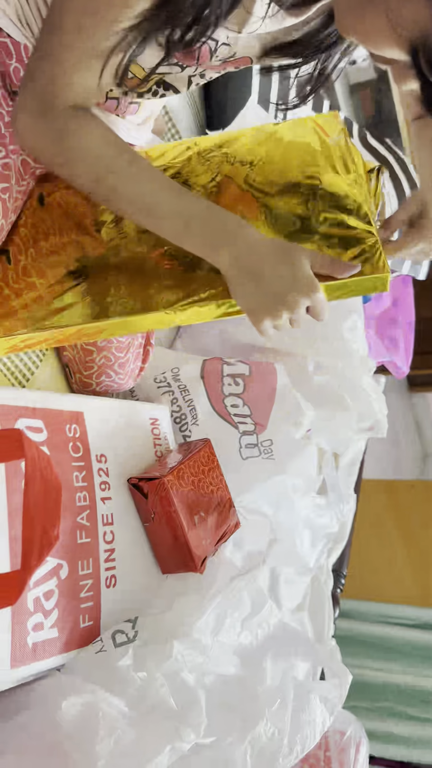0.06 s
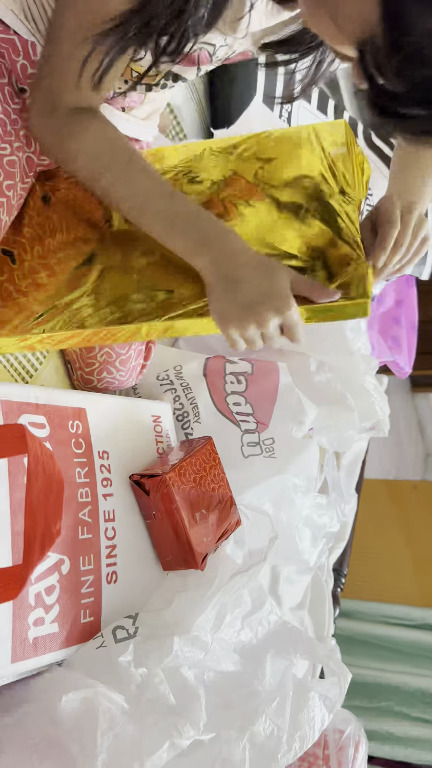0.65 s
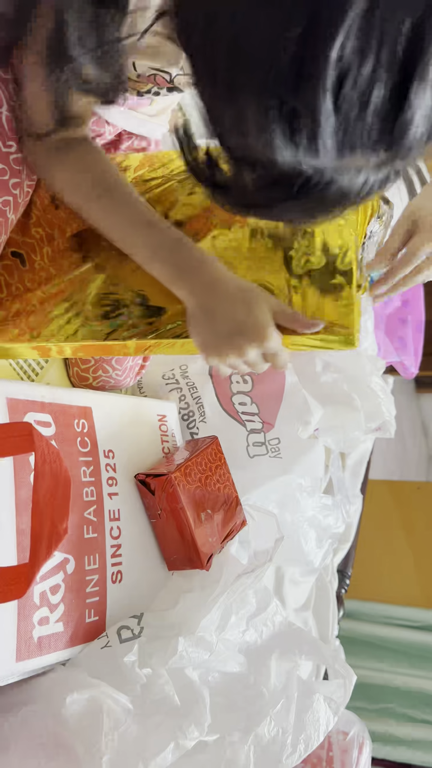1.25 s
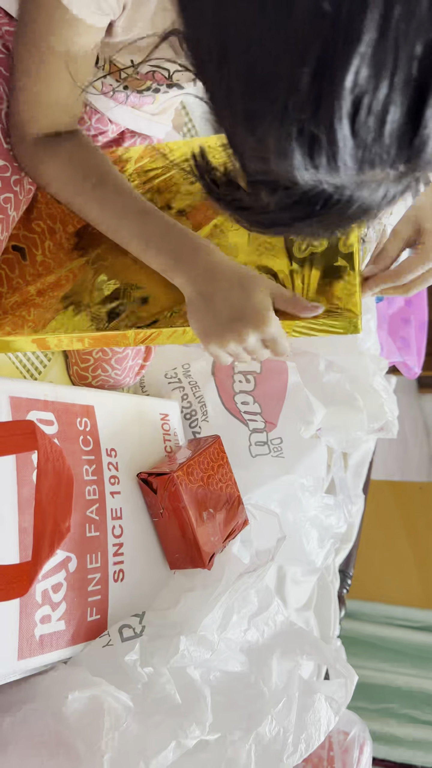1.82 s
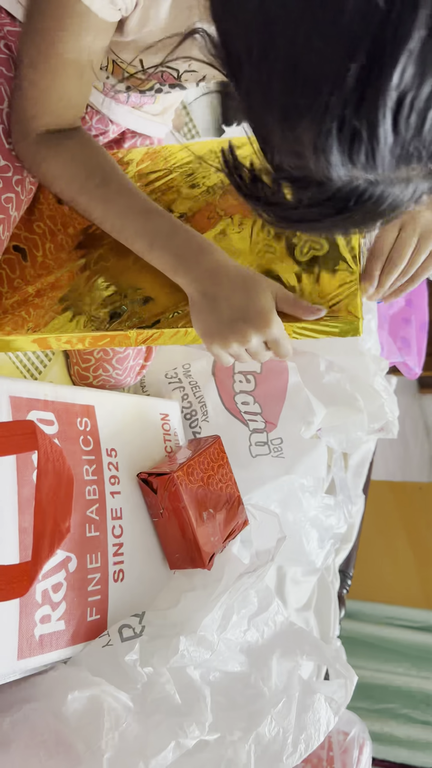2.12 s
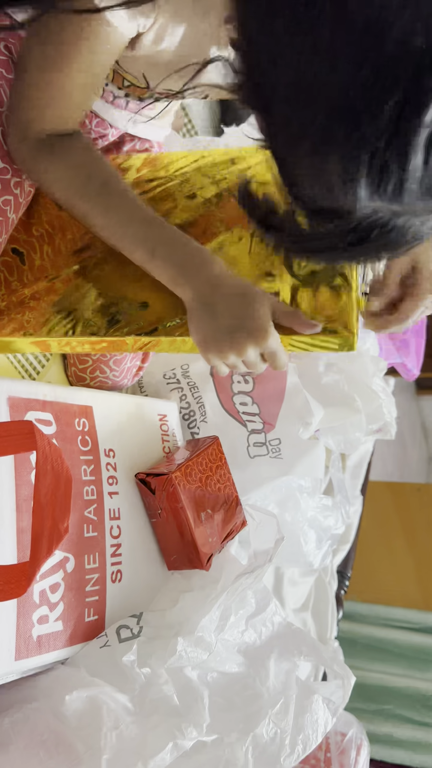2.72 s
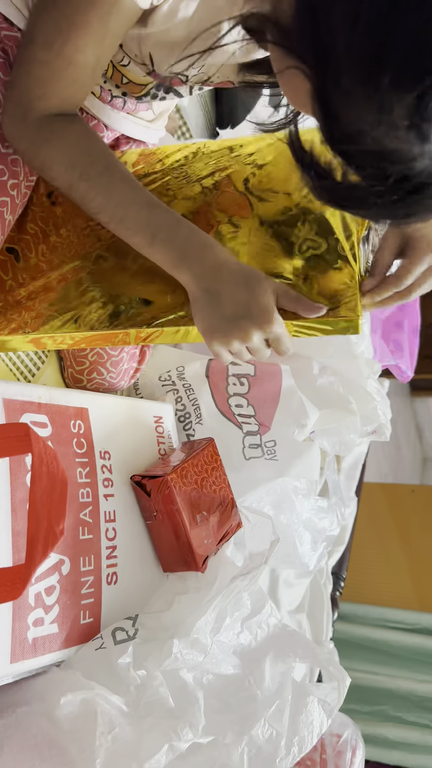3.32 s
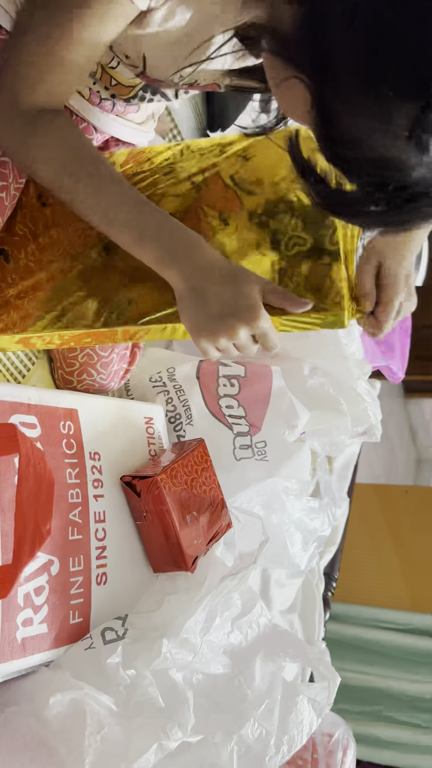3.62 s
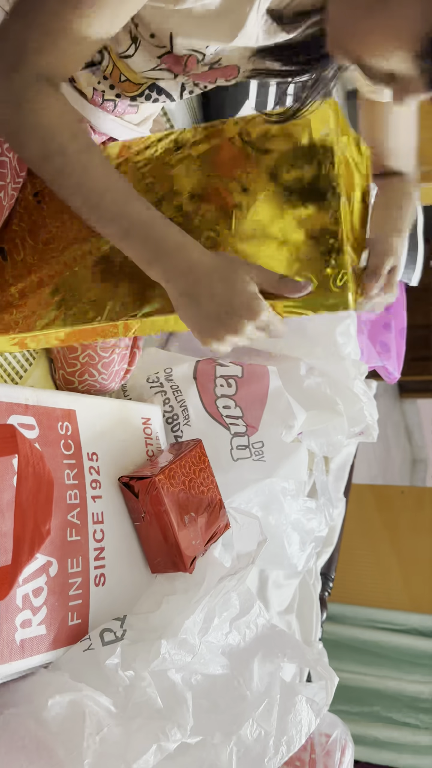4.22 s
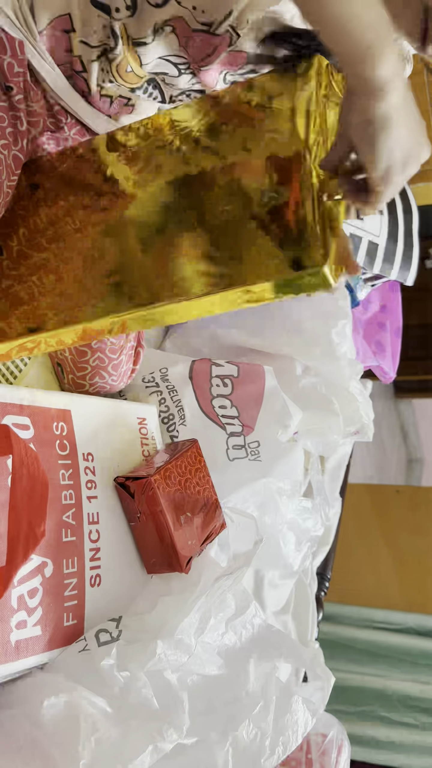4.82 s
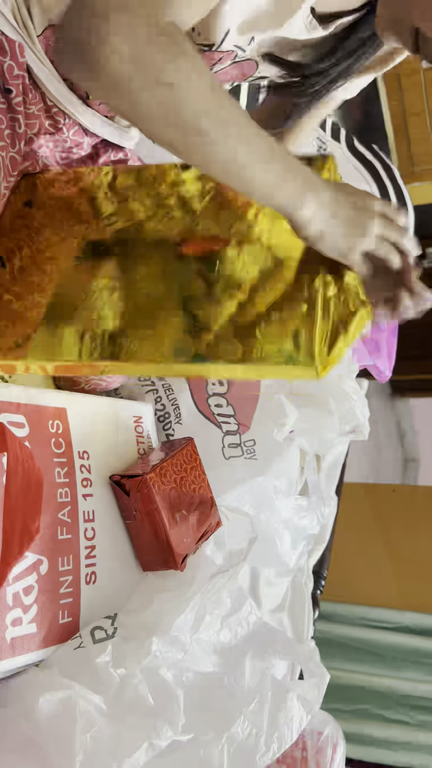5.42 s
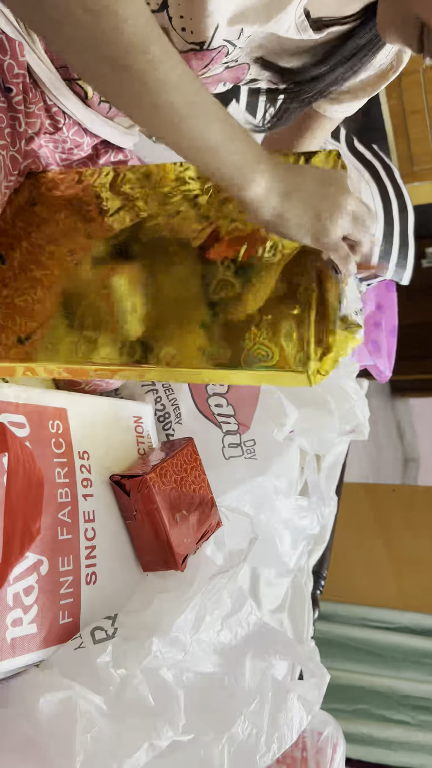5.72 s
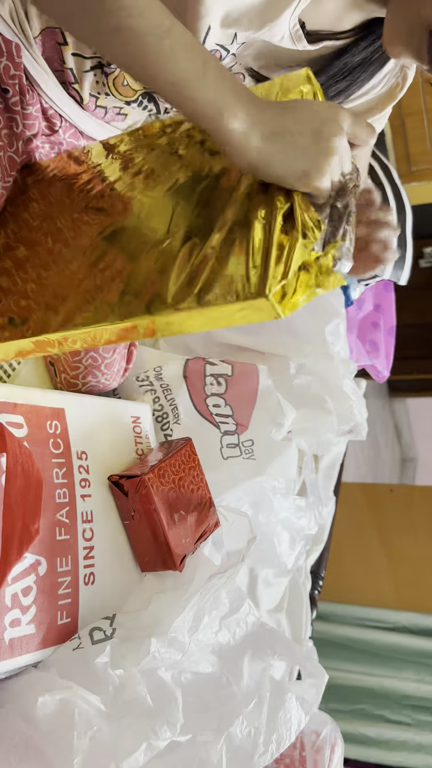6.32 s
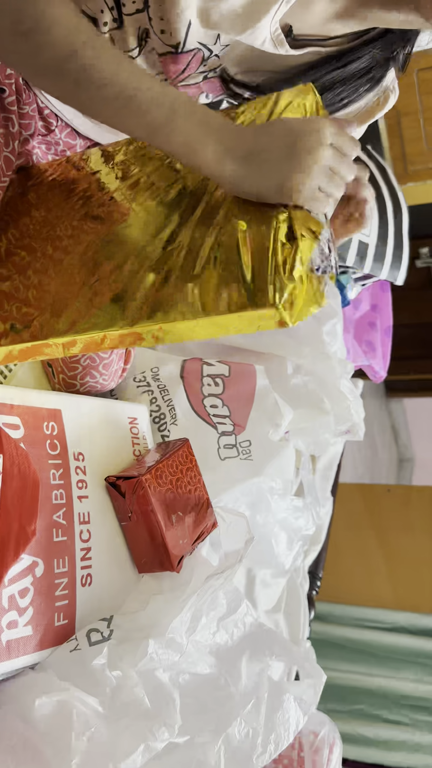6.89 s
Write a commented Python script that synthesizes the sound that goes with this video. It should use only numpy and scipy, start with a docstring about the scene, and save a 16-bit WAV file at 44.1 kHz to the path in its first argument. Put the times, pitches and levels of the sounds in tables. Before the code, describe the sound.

Hands pick at the taped end of a foil-wrapped cardboard box in a small, quiet room. The foil crinkles in light, irregular bursts with tiny snaps while fingers scuff and tap the cardboard. Halfway through, a sharp crack starts a busier stretch of tugging, with louder rustling, a few very short rips, hollow knocks and soft low bumps. The sound is close and slightly to the left.

```python
"""A small room: hands pick at the taped end of a cardboard box in metallic gift foil, then tug it open.
The foil crinkles in countless tiny buckles and cracks sharply when tape or a fold lets go.
The box scuffs by stick-slip, rings when its panels are struck and bumps on its support.
Tape and foil rip in short chains of slips. The walls answer over a faint steady background."""
import sys
import numpy as np
from scipy import signal
from scipy.fft import rfft, irfft, next_fast_len
from scipy.io import wavfile
from scipy.ndimage import uniform_filter1d, map_coordinates

SR = 44100
rng = np.random.default_rng(int(sys.argv[2]) if len(sys.argv) > 2 else 0)


def materialize(psi):
    """Save the field psi as 16-bit PCM at rate SR to the path in sys.argv[1].

    A 1-D psi becomes a single channel; in a 2-D psi each row is a channel.
    """
    bounded = np.clip(np.atleast_2d(psi).T, -1, 1)
    quanta = np.round(bounded * 32767).astype(np.int16)
    wavfile.write(sys.argv[1], SR, quanta)


N = 315315
TIME = np.arange(N) / SR


def amp(db):
    """Decibels to gain."""
    return 10 ** (np.asarray(db) / 20)


def unit(x):
    """Scale to rms 1."""
    return x / np.sqrt(np.mean(x ** 2) + 1e-20)


def along(points, hz):
    """Interpolate (freq_hz, value) points on a log axis."""
    freqs_hz, values = np.transpose(points)
    return np.interp(np.log(hz + 1), np.log(freqs_hz + 1), values)


def fade(t, t60_s):
    """Decay of 60 dB in t60_s."""
    return np.exp(-np.log(1000) * t / t60_s)


def wobble(knots_per_s):
    """Smooth random curve."""
    return map_coordinates(rng.standard_normal(int(N * knots_per_s / SR) + 4), [TIME * knots_per_s])


def noise(samples=N):
    """Two independent white noises."""
    return rng.standard_normal((2, samples))


def filtered(x, response):
    """Apply the gain response(hz)."""
    size = x.shape[-1]
    padded = next_fast_len(size + SR // 8)
    return irfft(rfft(x, padded) * response(np.fft.rfftfreq(padded, 1 / SR)), padded)[..., :size]


def add(track, start_s, sound):
    """Mix a sound into the track."""
    part = track[:, max(round(start_s * SR), 0):][:, :sound.shape[-1]]
    part += sound[:, :part.shape[-1]]


# Stereo width: freq_hz, side_over_mid_db
STEREO_WIDTH = [(60, -17), (200, -16), (400, -6), (1200, -2.5), (2400, 1.5), (5000, 4), (8000, 12),
                (11000, -5), (15000, 3.5)]


def voiced(pair, spectrum, width_db=0):
    """Colour two independent signals into stereo of rms 1: bass narrow, treble wide."""
    def response(hz):
        width = amp(along(STEREO_WIDTH, hz) + width_db)
        return amp(along(spectrum, hz)) * [np.ones_like(hz), width] / np.hypot(1, width)
    mid, side = filtered(pair, response)
    return unit(np.array([mid + side, mid - side]))


def buckles(per_s, spread_db, t60_s, bed):
    """Envelope of tiny uneven bursts over a bed of smooth sliding."""
    struck = rng.random(N) < per_s / SR
    sizes = amp(spread_db * np.clip(rng.standard_normal(N), -2, 2))
    energy = np.abs(signal.fftconvolve(struck * sizes ** 2, fade(TIME[:SR // 20], t60_s) ** 2)[:N])
    # The hand feeds in work steadily: a large buckle leaves less for its neighbours.
    supply = np.abs(uniform_filter1d(energy, size=3000)) + 0.34 * energy.mean()
    return np.sqrt(energy / supply + bed)


def facets(pair, depth_db):
    """The creased sheet changes shape, shifting its colour in patches of time and frequency."""
    spectra = signal.stft(pair, nperseg=256)[2]
    patches = uniform_filter1d(rng.standard_normal(spectra.shape[1:]), size=7, axis=0)
    patches = unit(uniform_filter1d(patches, size=7, axis=1))
    return unit(signal.istft(spectra * amp(depth_db * patches), nperseg=256)[1][:, :N])


# Foil rustle: freq_hz, level_db
FOIL_SPECTRUM = [(600, -8), (1500, -7.5), (2500, -3), (4000, -3), (5000, -2.5), (6300, -1.5), (8200, -3),
                 (10300, 0.5), (12500, -6), (14400, -1), (16000, -12.5)]


def crinkle(level_db):
    """The whole sheet buckles in a fine rustle; creases near the fingers tick."""
    per_s = 800 * amp(0.35 * (np.minimum(level_db, -30) + 46.5))  # harder work, denser buckling
    sheet = facets(buckles(per_s, spread_db=-1, t60_s=0.014, bed=0.17) * noise(), depth_db=2)
    rustle = voiced(sheet, FOIL_SPECTRUM, width_db=-6)
    creases = facets(buckles(75, spread_db=5, t60_s=0.0097, bed=0) * noise(), depth_db=4)
    tick_spectrum = [(1200, -16), (3500, -4.5), (7000, 17.5), (11000, 2), (16000, -6)]
    ticks = voiced(creases, tick_spectrum, width_db=-9.5)
    tick_db = -6.5 - 0.26 * (level_db + 61)  # ticks stand out when the foil barely moves
    clumps_db = 0.66 * wobble(55)
    return amp(level_db + clumps_db - 1) * (rustle + amp(tick_db) * ticks)


# Rubbed cardboard: freq_hz, level_db
SCUFF_SPECTRUM = [(80, -22.5), (160, -2), (280, -0.5), (450, -2), (720, 1.5), (1000, -0.5), (1350, -1.5),
                  (1800, -6), (2400, -9), (4000, -16), (8000, -62)]


def scuff(level_db, count=3200):
    """Fingers and foil stick and slip on cardboard; each slip rings a patch at its own pitch."""
    t = TIME[:SR // 60]
    start, pitch, *phases = rng.random((4, count, 1))
    hz = 250 * 20 ** pitch
    size = amp(5.5 * np.clip(rng.standard_normal((count, 1)), -2, 2))
    envelope = size * fade(t, 22 / hz) * (1 - t / t[-1]) * hz
    indices = ((start * N).astype(int) + np.arange(len(t))).ravel()
    rings = [envelope * np.sin(2 * np.pi * (hz * t + phase)) for phase in phases]
    slips = np.array([np.bincount(indices, ring.ravel(), N)[:N] for ring in rings])
    rub = buckles(200, spread_db=5.5, t60_s=0.011, bed=1) * noise()
    return amp(level_db + 1) * voiced(unit(slips) + 2.26 * unit(rub), SCUFF_SPECTRUM, width_db=-2)


# Box rumble: freq_hz, level_db
HEAVE_SPECTRUM = [(20, -38), (35, -5), (55, 0), (125, -3), (200, -10.5), (300, -10.5), (600, -13),
                  (1200, -96)]


def heave(scuff_db):
    """The box shifts on its soft support, rumbling more under a harder scuff."""
    return amp(-56 + 0.95 * (scuff_db + 50.5)) * voiced(noise(), HEAVE_SPECTRUM)


def effort(start_s, length_s, levels_db, release_s, hold_db):
    """Summed stroke level in dB: each swells, holds and dies to the floor of resting hands."""
    t = np.linspace(0, N / SR, N // 64)
    swell = fade(np.maximum(start_s + 0.014 - t, 0), t60_s=0.1 + 0.82 * length_s)
    settle = fade(np.maximum(t - start_s - length_s, 0), release_s)
    power = np.sum((amp(levels_db) * swell * settle) ** 2, axis=0) + amp(hold_db) ** 2
    return np.interp(TIME, t, 10 * np.log10(power))


# Pinches, rubs and pulls: start_s, length_s, foil_db, box_db
HAND_STROKES = [ (0.0, 0.098, -53.5, -59), (0.137, 0.069, -49.5, -62), (0.257, 0.067, -47, -58),
                (0.398, 0.088, -51, -58), (0.508, 0.16, -54.5, -50.5), (0.876, 0.083, -49.5, -49.5),
                (0.998, .05, -45.5, -46.5), (1.085, 0.019, -49, -43.5), (1.16, 0.085, -57.5, -61.5),
                (1.336, 0.064, -47.5, -56), (1.6, 0.019, -63, -59.5), (1.679, 0.08, -55, -62),
                (1.82, 0.031, -65, -76), (1.987, 0.41, -56, -65), (2.433, .18, -57, -59.5),
                (2.689, 0.11, -52.5, -59), (2.92, 0.074, -66.5, -64.5), (3.18, 0.014, -58, -67),
                (3.283, 0.076, -58.5, -61), (3.37, 0.2, -56.5, -62), (3.524, 0.12, -44, -50.5),
                (3.749, 0.017, -46.5, -55.5), (3.894, 0.068, -52, -55), (4.032, 0.088, -48.5, -55),
                (4.117, 0.062, -42.5, -44), (4.266, 0.13, -46.5, -51), (4.472, 0.046, -53, -47),
                (4.538, 0.026, -39.5, -50), (4.604, 0.16, -41.5, -52), (4.755, 0.054, -38, -44),
                (4.884, 0.11, -42.5, -50), (4.986, .17, -37.5, -38), (5.156, 0.12, -45, -45.5),
                (5.31, 0.098, -48, -61), (5.395, .11, -43.5, -52.5), (5.578, 0.19, -45, -57.5),
                (5.762, 0.2, -42.5, -49), (5.991, 0.093, -42, -57), (6.059, .11, -40.5, -42.5),
                (6.235, 0.044, -48, -52), (6.332, .03, -55, -68), (6.436, 0.09, -49, -61),
                (6.597, 0.046, -55.5, -56), (6.733, 0.092, -43, -54.5), (6.936, 0.19, -47.5, -60.5)]


def handling():
    """Each stroke crinkles the foil, scuffs the box and shifts it; the grip varies by chance."""
    start_s, length_s, foil_db, box_db = np.transpose(HAND_STROKES)[:, :, None]
    grip_db = wobble(30)
    crinkle_db = effort(start_s, length_s, foil_db, release_s=0.3, hold_db=-82.5) + grip_db
    scuff_db = effort(start_s, length_s, box_db, release_s=0.22, hold_db=-67) + grip_db
    return crinkle(crinkle_db) + scuff(scuff_db) + heave(scuff_db)


# Wall reverberation: freq_hz, t60_s
WALL_DECAY = [(200, 0.3), (530, 0.33), (1400, 0.39), (3700, 0.46), (10000, 0.33), (16000, 0.4)]


def room(x):
    """Diffuse answer of the walls, each frequency dying at its own rate."""
    hz, t, spectra = signal.stft(noise(SR * 2 // 3), SR, nperseg=256)
    tail = signal.istft(spectra * fade(t, along(WALL_DECAY, hz)[:, None]), SR, nperseg=256)[1]
    tail = voiced(tail, [(50, 5.5), (300, -5), (3000, 3), (6200, 5), (8200, 4), (10400, 1), (16000, 1.5)])
    tail *= np.clip(TIME[:tail.shape[1]] / 0.0044, 0, 1) ** 2
    return signal.fftconvolve(x, tail / np.linalg.norm(tail[0]), axes=1)[:, :N]


# Room tone: freq_hz, level_db
BACKGROUND_SPECTRUM = [(22, -43), (36, -7), (49, 13.5), (65, -4), (100, 2.5), (160, -2.5), (450, -14),
                       (1070, -16), (2500, -30), (5000, -28), (10400, -23), (16000, -42)]


def background():
    """Faint steady noise, mostly bass."""
    return amp(-60) * voiced(noise(), BACKGROUND_SPECTRUM, width_db=4.5)


# Crack of a fold: freq_hz, level_db
CRACK_SPECTRUM = [(300, 9.5), (1200, -3), (3500, 3.5), (7000, 9.5), (8500, 4), (10300, 9), (12500, 1),
                  (14500, 8), (16000, -20)]
# Foil folds and tape letting go: start_s, level_db, tilt_db_per_octave
FOLD_SNAPS = [(0.2647, -46, -8), (0.323, -35.5, -3), (0.4256, -36, 7), (0.4582, -30, 14),
              (0.7241, -38.5, -5.5), (1.0344, -29, -2.5), (1.2334, -40, 7), (1.3972, -40, 14),
              (1.6078, -48, 4), (1.6888, -44, 12), (1.9795, -44, 10), (2.208, -46.5, -11),
              (2.4541, -35, 10), (2.682, -39, 9), (2.7667, -37.5, 9), (3.1667, -54, 11), (3.1813, -42, 1),
              (3.3775, -39.5, -0.5), (3.4964, -38, 16), (3.7565, -36.5, 4), (3.5319, -14, 17),
              (4.0428, -32.5, 10), (4.1256, -23, 16), (4.1301, -25.5, 9), (4.7319, -19, 2),
              (4.7888, -25, -1), (4.9404, -26, 2.5), (4.9762, -15, -1), (5.0507, -16.5, 2.5),
              (5.134, -24.5, -6.5), (6.0665, -16, 0.5), (6.147, -27, 2), (6.163, -29, 2), (6.249, -29, 13),
              (6.3406, -38, 5.5), (6.4124, -32.5, 7), (6.6396, -36.5, -.5), (6.9797, -38.5, -5),
              (7.0532, -34, -2)]


def snaps(folds):
    """A fold flips with a brief crack; small tight folds are brightest and die fastest."""
    out, t = np.zeros((2, N)), TIME[:SR // 16]
    for start_s, level_db, tilt in folds:
        t60_s = 0.012 * 0.5 ** (tilt / 25)
        run_s = 0.0011 * amp(level_db + 9)  # a louder crack runs longer along its fold
        run = fade(np.maximum(t - run_s, 0), t60_s)
        spike = 0.5 * fade(t, 0.0041)
        shiver = 0.04 * fade(t, 0.061)
        envelope = run + spike + shiver
        spectrum = [(hz, db + tilt * np.log2(max(hz, 3000) / 3000)) for hz, db in CRACK_SPECTRUM]
        crack = voiced(noise(len(t)), spectrum, width_db=-11) * envelope
        add(out, start_s, amp(level_db + 2) * crack * np.linalg.norm(envelope) / np.linalg.norm(crack))
    return out


def small_folds(per_s=6):
    """Small folds spring back by chance with faint snaps."""
    draws = rng.random((round(per_s * N / SR), 3))
    return snaps([(when * N / SR, -48 + 2 * size, 12 * tightness) for when, size, tightness in draws])


def panel(pitch_hz, count=7):
    """Struck cardboard rings in close modes, strongest at the centre; low panels ring longer."""
    t = TIME[:SR // 8]
    offset = np.linspace(-1, 1, count)[:, None]
    modes_hz = pitch_hz * np.exp(0.3 * offset + 0.024 * rng.standard_normal((count, 1)))
    weights = np.exp(-2 * offset ** 2)
    phase = 2 * np.pi * (modes_hz * t + rng.random((count, 1)))
    skew_rad = 0.077 * rng.standard_normal((count, 1))
    ring = np.array([(weights * np.sin(phase + side * skew_rad)).sum(0) for side in (1, -1)])
    envelope = fade(t, 0.024 * (1000 / pitch_hz) ** 0.5) * (1 - np.exp(-t / 0.000051))
    return ring * envelope * np.linalg.norm(envelope) / np.linalg.norm(ring * envelope)


# Panels struck by fingers or recoiling wrap: start_s, level_db, pitch_hz
PANEL_KNOCKS = [(0.540, -38, 513), (0.611, -38, 523), (0.725, -40, 1070), (1.025, -34, 567),
                (1.093, -31.5, 565), (1.099, -33, 208), (2.217, -43.5, 1170), (2.314, -41, 980),
                (2.553, -40.5, 1130), (2.957, -44, 710), (3.073, -50.5, 1097), (3.295, -44, 710),
                (3.905, -52, 880), (4.133, -30, 962), (4.491, -33, 1119), (4.519, -33.5, 950),
                (4.763, -24.5, 1164), (5.009, -20, 790), (5.136, -26.5, 1470), (5.925, -35, 1520),
                (6.062, -19, 790), (6.148, -20, 1490), (6.149, -24.5, 233), (6.613, -43, 1300)]
# Box recoiling as tape gives way: start_s, level_db, main_mode_hz, upper_mode_hz
BOX_RECOILS = [(3.531, -16, 1220, 2330), (4.9756, -18, 1220, 3722), (5.0502, -16.5, 1026, 3350),
               (6.0665, -19, 935, 2220)]


def knocks(upper_boost_db=1.5):
    """A contact click and a damped panel ring; a recoil rings the panel in a main and an upper mode at once."""
    out, t = np.zeros((2, N)), TIME[:SR // 16]
    blows = list(PANEL_KNOCKS)
    for start_s, level_db, main_mode_hz, upper_mode_hz in BOX_RECOILS:
        blows += [(start_s, level_db, main_mode_hz), (start_s, level_db + upper_boost_db, upper_mode_hz)]
    for start_s, level_db, hz in blows:
        spectrum = [(hz / 5, -28), (hz / 2, -10), (hz, 0), (hz * 1.65, -4), (hz * 6, -20)]
        click = voiced(noise(len(t)), spectrum, width_db=-0.5) * fade(t, 0.045)
        click_db = -5.5 - 0.25 * (level_db + 33)  # light touch mostly click, hard blow mostly ring
        add(out, start_s, amp(level_db + click_db) * click)
        add(out, start_s, amp(level_db - 3) * panel(hz))
    return out


# Whole box bumping: start_s, level_db, pitch_hz
BOX_BUMPS = [(0.549, -43, 151), (0.631, -35, 156), (1.031, -39, 151), (1.102, -30, 130), (3.546, -35, 119),
             (4.789, -46, 100), (5.014, -25, 91), (5.06, -27, 79.6), (5.185, -38, 143), (5.256, -33, 150),
             (5.41, -35, 70), (6.082, -31.5, 62), (6.159, -27, 68)]


def bumps():
    """The box drops back on its support: a few low cycles."""
    out, t = np.zeros((2, N)), TIME[:SR // 4]
    for start_s, level_db, pitch_hz in BOX_BUMPS:
        envelope = fade(t, 4 / pitch_hz) * (1 - np.exp(-t / 0.0016))
        add(out, start_s, amp(level_db + 4.5) * np.sin(2 * np.pi * pitch_hz * t)[None] * envelope)
    return out


# Tape and foil ripping: start_s, level_db, length_s, resonance_hz
TAPE_RIPS = [(4.113, -41, 0.051, 7050), (4.979, -33, 0.077, 3770), (6.055, -32.5, 0.053, 3680)]


def rips():
    """A fast, uneven chain of slips rings the taut sheet, weakening as it runs."""
    out = np.zeros((2, N))
    slips = buckles(500, spread_db=3, t60_s=0.005, bed=0.1)
    for start_s, level_db, length_s, hz in TAPE_RIPS:
        progress = np.linspace(0, 1, int(length_s * SR))
        chain = slips[round(start_s * SR):][:len(progress)] * noise(len(progress))
        spectrum = [(hz / 4, -16), (hz / 1.6, -7), (hz, 0), (hz * 1.28, -8), (hz * 4, -16)]
        envelope = np.minimum(progress * 20, 1) * np.sqrt(1 - progress)
        add(out, start_s, amp(level_db) * voiced(chain, spectrum, width_db=-6) * envelope)
    return out


def lean_left(hz):
    """Stereo response: the left side is slightly louder and leads in phase."""
    lean_db = along([(100, 2.7), (500, 2.3), (1000, 0.19), (2200, 0.4), (4500, 2.8), (9000, 0.24)], hz)
    lead_rad = along([(200, 0), (1200, 0.19), (3000, 1), (9000, 0)], hz)
    sides = np.array([[0.5], [-0.5]])
    return amp(sides * lean_db) * np.exp(1j * sides * lead_rad)


def scene():
    """The parcel and its room, slightly left, over the background."""
    rustling = handling() + rips() + bumps()
    blows = snaps(FOLD_SNAPS) + knocks() + small_folds()
    reverb = room(amp(-9.5) * rustling + amp(-6) * blows)
    return filtered(rustling + blows + reverb, lean_left) + background()


def record(dry):
    """Cut the deepest bass and the highest treble."""
    low_hz, top_hz = 37, 16100
    thinned = signal.sosfilt(signal.butter(4, low_hz, "highpass", fs=SR, output="sos"), dry)
    return filtered(thinned, lambda hz: np.clip((top_hz - hz) / 300 + 0.5, 0, 1))


dry = scene()
out = record(dry)
materialize(out)
```